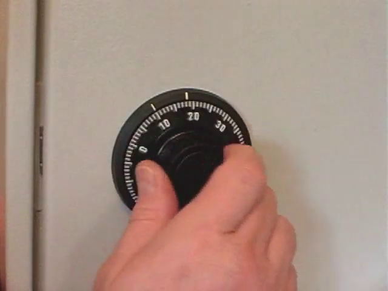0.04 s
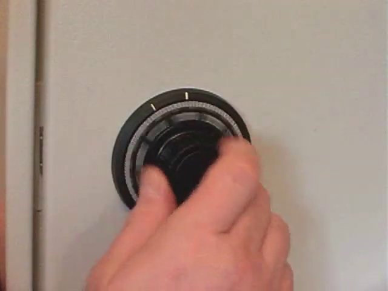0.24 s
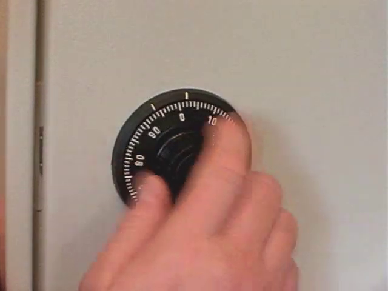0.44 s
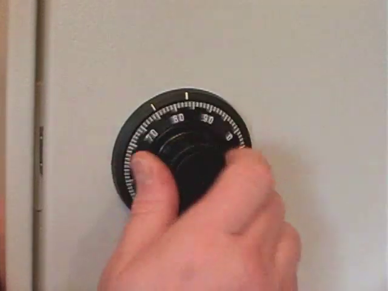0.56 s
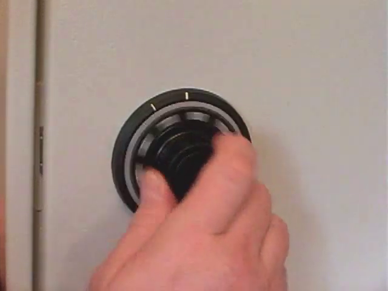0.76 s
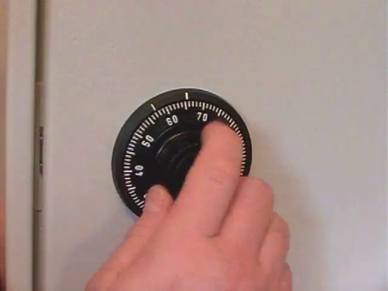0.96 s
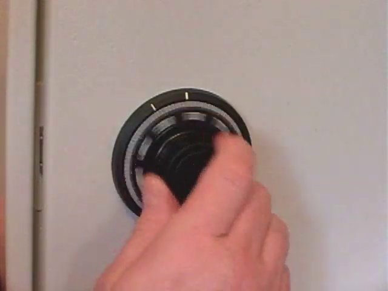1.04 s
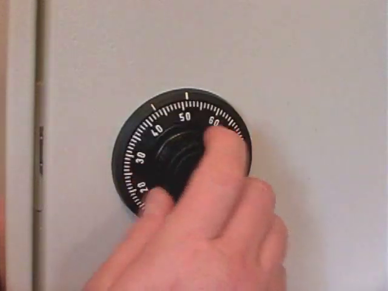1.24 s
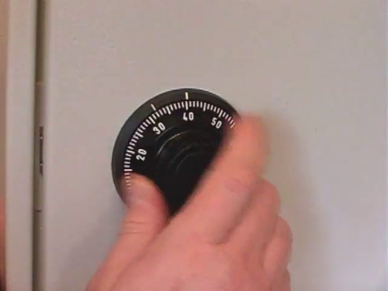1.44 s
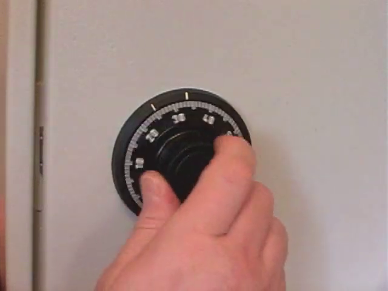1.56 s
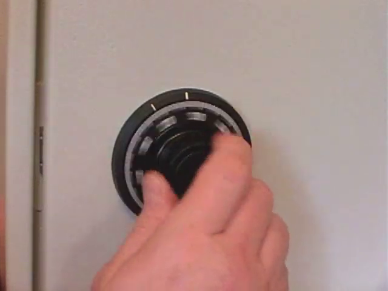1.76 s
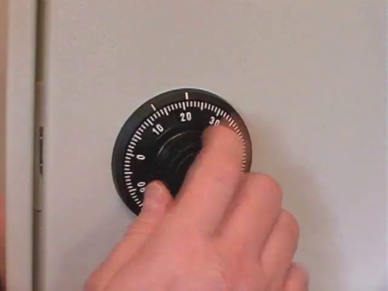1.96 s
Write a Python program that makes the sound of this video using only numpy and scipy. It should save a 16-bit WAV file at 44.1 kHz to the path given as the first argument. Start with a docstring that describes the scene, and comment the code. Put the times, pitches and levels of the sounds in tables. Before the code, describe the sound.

A safe's combination dial spins in about eight quick turns over two seconds, each a short metallic rub with a low shudder from the steel door. The lock catches with a ringing clack at about 0.35 seconds, again at 0.6 and more softly at 0.9, among small ticks. From 1.1 seconds the turns are quieter. The room is small and quiet, with faint hiss and a thin high whine.

```python
"""A steel safe door shudders with a low note as a hand spins its combination dial in eight quick turns.
Friction drives the door's resonances and makes the spindle rub and faintly sing. The lock's wheels
catch with a clack that sets the case ringing, and small metal parts tick. The hand rumbles on the knob.
The room is small and quiet; behind it all lie a camera's hiss and thin whine."""
import sys
import numpy as np
from scipy import signal
from scipy.fft import rfft, irfft
from scipy.io import wavfile
from scipy.ndimage import uniform_filter1d

SR = 44100
rng = np.random.default_rng(int(sys.argv[2]) if len(sys.argv) > 2 else 0)


def wav_out(sig):
    """Save sig, one row per channel (or a flat mono array), as 16-bit PCM at SR to the path in sys.argv[1]."""
    wavfile.write(sys.argv[1], SR, np.round(np.clip(np.atleast_2d(sig).T, -1, 1) * 32767).astype(np.int16))


N = 88200
TIME = np.arange(N) / SR


def door():
    """Forced vibration: friction drives the door's main note and, more loosely, its other resonances."""
    # The door's shudders. Each row: start in seconds, length in seconds, level of the main note in dB,
    # level of the other resonances in dB.
    shudders = [(-.01, 0.0077, -60, -48.5), (.042, 0.025, -46.5, -48), (.1, 0.053, -45.5, -46),
                (0.19, 0.19, -55.5, -65), (0.321, 0.063, -43.5, -48.5), (0.357, 0.036, -38.5, -38.5),
                (0.546, 0.051, -41, -41.5), (0.573, 0.051, -43, -40.5), (.65, 0.055, -50, -48),
                (0.789, 0.0046, -52.5, -52.5), (0.847, 0.056, -60, -51), (0.902, 0.09, -47, -47.5),
                (1.099, 0.051, -50, -56.5), (1.144, 0.073, -48.5, -51), (1.287, 0.055, -57.5, -55),
                (1.365, 0.0053, -47, -45.5), (1.41, 0.071, -57, -54.5), (1.592, .02, -45.5, -58),
                (1.613, 0.029, -47, -53), (1.643, 0.074, -71, -56), (1.823, 0.045, -51, -52.5),
                (1.896, 0.067, -63, -55.5)]
    # The other resonances. Each row: frequency in Hz, bandwidth in Hz, relative level in dB.
    resonances = [(99, 6.7, -18), (143.2, 4, -10), (247, 10, 0), (286, 11, -2.5), (310.1, 4, 0),
                  (334.5, 13, -2), (394, 6, -9.5), (428, 12.6, -9.5), (494, 54, -14), (532, 38, -16.5),
                  (637, 38, -14.5), (715, 15, -12), (846, 73, -11)]
    rise_s, t60_s, steadiness = 0.0077, 0.23, 0.95
    note = tone(hz=232.7, wander_hz=3.62, wander_width_hz=31.5)
    ring = unit(sum(amp(db) * band(hz, width) for hz, width, db in resonances))
    power = uniform_filter1d(ring ** 2, size=900) + 1e-6
    ring = unit(ring / power ** (steadiness / 2))  # evens out most of the random swelling
    note_strokes = [(start, length, db) for start, length, db, _ in shudders]
    ring_strokes = [(start, length, db) for start, length, _, db in shudders]
    return note * strokes(note_strokes, rise_s, t60_s) + ring * strokes(ring_strokes, rise_s, t60_s)


def wheels():
    """Impact excitation: each catch gives a crack and a rattle, and the lock case's modes ring freely."""
    # The catches. Each row: start in seconds, then relative levels in dB of the crack, of its part
    # below shelf_hz, and of the case's ring.
    clacks = [(.3588, -1, -1, -1.5), (.588, -5, -5, -16), (.9135, -21.5, 3, -9), (.922, -17, -2, -20)]
    # The crack's spectrum. Each row: frequency in Hz, relative spectral density in dB.
    crack_spectrum = [(30, -49), (120, -15), (350, -6), (700, 0), (1100, 1.5), (1700, 4.5), (2400, 0.5),
                      (3400, 1), (4100, -3), (4800, -7), (5700, -9.5), (7500, -12.5), (9300, -15),
                      (10300, -14), (11500, -21.5), (16000, -30)]
    # The case's modes. Each entry: frequency in Hz in the first list, relative level in dB in the second.
    modes_hz = [142, 429, 713, 849, 1167, 1315, 1644, 1744, 2237, 3075, 3241, 3430, 3569, 5590, 5841, 10220]
    modes_db = [-10.5, -16.5, -7, -15, -7.5, -13, -3, -2, 1, -7, 1.5, 0, -5, -4, -17, -14]
    crack_db, crack_hold_s, rattle_db, case_db = -28.5, 0.0057, -14, -40
    shelf_hz, direct_shelf_db = 2500, -8  # the direct crack is thinner than its reverberation
    direct, full, ring = np.zeros((3, N))
    t = TIME[:SR]
    envelope = fade(t - crack_hold_s, t60=0.038) + amp(rattle_db) * fade(t, t60=0.1)
    for start, db, mids_db, ring_db in clacks:
        crack = rng.choice([-1, 1], len(t)) * envelope
        for path, shelf_db in ((full, mids_db), (direct, mids_db + direct_shelf_db)):
            spectrum = [(hz, level + shelf_db * (hz < shelf_hz)) for hz, level in crack_spectrum]
            add(path, start, amp(crack_db + db) * colour(crack, spectrum))
        for hz, mode_db in zip(modes_hz, modes_db):
            t60 = 0.43 * (hz / 1000) ** -0.64  # higher modes die sooner
            mode = np.sin(2 * np.pi * (hz * t + rng.random()))
            add(ring, start, amp(case_db + ring_db + mode_db) * fade(t, t60) * mode)
    echoes = room(full, wet_db=-2.5) - full
    return direct + echoes + ring


def spindle():
    """Stick-slip friction: dense tiny slips of metal on metal, now and then with a thin singing ring."""
    # Spells of rubbing and of singing. Each row: start in seconds, length in seconds, level in dB.
    rubs = [(.096, 0.056, -46), (.325, 0.042, -47.5), (.566, 0.027, -43.5), (.858, 0.064, -50.5),
            (.912, 0.03, -44), (1.118, 0.072, -49.5), (1.39, 0.044, -51.5), (1.622, 0.013, -52),
            (1.866, 0.035, -54)]
    sings = [(.25, 0.072, -66), (.38, 0.087, -52), (1.28, 0.11, -64)]
    # The spectrum of the rubbing. Each row: frequency in Hz, relative spectral density in dB.
    rub_spectrum = [(200, -22), (500, 2.5), (1100, -3), (2000, -1.5), (3400, 4), (4600, -1.5), (5200, -12),
                    (5600, 5), (6300, -8.5), (9000, -22), (15000, -44)]
    slips_per_s = 3000
    slips = (rng.random(N) < slips_per_s / SR) * rng.choice([-1, 1], N)
    friction = unit(slips) * strokes(rubs, rise_s=0.0065, t60=0.022)
    rub = room(colour(friction, rub_spectrum), wet_db=-6.5)
    singing = tone(hz=3440, wander_hz=25, wander_width_hz=120)
    return rub + singing * strokes(sings, rise_s=0.037, t60=0.17)


def ticks():
    """Damped free vibration: a small metal part snaps and rings briefly at two unsteady pitches."""
    # The ticks. Each row: start in seconds, level of the lower ring in dB, level of the upper ring in dB.
    strikes = [(.134, -37, -31.5), (0.322, -41, -32.5), (0.332, -41.5, -34.5), (0.358, -27, -30.5),
               (0.5693, -31, -50), (0.5887, -32, -47), (0.636, -40.5, -64), (.922, -36.5, -73),
               (.944, -58, -65), (1.144, -54, -65), (1.277, -51.5, -65)]
    # The snap's spectrum. Each row: frequency in Hz, relative spectral density in dB.
    snap_spectrum = [(500, -30), (3000, -8), (7000, -5), (8300, 6), (11000, -8), (13000, -12), (16000, -26)]
    low_hz, high_hz, pitch_spread = 5580, 10110, 0.011
    rise_s, snap_db = 0.0024, -10.5
    out, t = np.zeros(N), TIME[:SR // 10]
    envelope = np.minimum(t / rise_s, 1) * fade(t - rise_s, t60=0.025)
    for start, low_db, high_db in strikes:
        for hz, db in ((low_hz, low_db), (high_hz, high_db)):
            waver = unit(uniform_filter1d(rng.standard_normal(len(t)), size=30))
            phase = 2 * np.pi * np.cumsum(hz * (1 + pitch_spread * waver)) / SR
            add(out, start, amp(db) * envelope * np.sin(phase))
        snap = rng.standard_normal(len(t)) * fade(t, t60=0.015)
        add(out, start, amp(high_db + snap_db) * colour(snap, snap_spectrum))
    return room(out, wet_db=-8)


def hand_rumble():
    """Narrow-band noise: a faint deep rumble while the hand works hardest on the knob."""
    # The hand's efforts. Each row: start in seconds, length in seconds, level in dB.
    efforts = [(.2, 0.26, -68), (.58, 0.38, -68)]
    return band(hz=43, width_hz=8) * strokes(efforts, rise_s=0.068, t60=0.136)


def room(x, wet_db):
    """Reverberation: adds a dense, even tail in which each band dies at its own rate."""
    # The room's decay. Each row: frequency in Hz, reverberation time in seconds.
    decay_times = [(100, 0.46), (300, 0.39), (700, 0.73), (1400, 0.39), (3300, 0.41), (5500, 0.38),
                   (10000, 0.29), (16000, 0.22)]
    peak_ratio, build_up_s = 2.23, 0.014
    hz, t, noise = signal.stft(rng.choice([-1., 1.], SR), SR, nperseg=256)
    decaying = noise * fade(t, read(decay_times, hz)[:, None])
    spectrum = rfft(signal.istft(decaying, SR, nperseg=256)[1][:SR])
    ceiling = peak_ratio * uniform_filter1d(abs(spectrum), size=400)  # caps the strongest resonances
    tail = irfft(spectrum / np.maximum(abs(spectrum) / ceiling, 1), SR)[:SR // 2]
    tail *= np.minimum(TIME[:SR // 2] / build_up_s, 1) ** 2
    return x + amp(wet_db) * signal.fftconvolve(x, tail / np.linalg.norm(tail))[:N]


def background():
    """Broadband noise and spectral lines: room tone and hiss, the camera's whine and faint rapid chirps."""
    # Room tone and hiss. Each row: frequency in Hz, relative spectral density in dB.
    hiss_spectrum = [(15, -21), (25, -17.5), (92, -8.5), (242, -5), (285, -14), (344, -10), (439, -11),
                     (607, -12.5), (1370, -15.5), (2110, -17), (2280, -17), (3520, -18.5), (4370, -19.5),
                     (5730, -19.5), (10700, -23), (13600, -19), (16000, -33.5)]
    # The lines of the whine. Each entry: frequency in Hz.
    lines_hz = [13184, 15195, 15224]
    # The same lines. Each row: level in dB, rms pitch wander in Hz.
    lines = [(-62.5, 0.5), (-66, 1.5), (-78, 4)]
    hiss_db, chirp_db = -54, -50
    chirp_at_s, chirps_per_s, chirp_width_s = 0.0342, 29.97, 0.0007
    centre_hz, sweep_hz_per_s = 13800, 900000
    hiss = amp(hiss_db) * colour(rng.standard_normal(N), hiss_spectrum)
    whine = sum(amp(db) * tone(hz, wander, wander_width_hz=18) for hz, (db, wander) in zip(lines_hz, lines))
    # time from the centre of the nearest chirp
    offset_s = (((TIME - chirp_at_s) * chirps_per_s + .5) % 1 - .5) / chirps_per_s
    sweep = np.sin(2 * np.pi * (centre_hz + sweep_hz_per_s * offset_s / 2) * offset_s)
    pulses = np.exp(-.5 * (offset_s / chirp_width_s) ** 2)
    return hiss + whine + amp(chirp_db) * sweep * pulses


def tone(hz, wander_hz, wander_width_hz):
    """Frequency modulation: a sine of rms 1 whose pitch wanders at random."""
    pitch_hz = hz + wander_hz * band(0, wander_width_hz)
    return np.sqrt(2) * np.sin(2 * np.pi * np.cumsum(pitch_hz) / SR)


def band(hz, width_hz):
    """Resonance: noise of rms 1 gathered around one frequency."""
    f = np.fft.rfftfreq(N, 1 / SR)
    return unit(irfft(rfft(rng.standard_normal(N)) / (1 + (2 * (f - hz) / width_hz) ** 2), N))


def colour(x, points, size=4096):
    """Spectral shaping by a causal filter of unit energy."""
    log_gain = np.log(amp(read(points, abs(np.fft.fftfreq(size, 1 / SR)))))
    taps = np.fft.ifft(np.exp(np.conj(signal.hilbert(log_gain)))).real[:size // 2]
    return signal.fftconvolve(x, taps / np.linalg.norm(taps))[:len(x)]


def strokes(rows, rise_s, t60):
    """Incoherent addition: each row's envelope rises, holds and decays, and their powers sum."""
    envelopes = (amp(db) * np.clip((TIME - start) / rise_s, 0, 1) * fade(TIME - start - length, t60)
                 for start, length, db in rows)
    return np.sqrt(sum(envelope ** 2 for envelope in envelopes))


def fade(t, t60):
    """Exponential decay from t = 0, by 60 dB in t60 seconds."""
    return np.exp(-np.log(1000) * np.maximum(t, 0) / t60)


def amp(db):
    """Decibels to amplitude ratio."""
    return 10 ** (np.asarray(db) / 20)


def unit(x):
    """Normalisation to rms 1."""
    return x / np.sqrt(np.mean(x ** 2) + 1e-20)


def read(points, hz):
    """Interpolation of a table on a log-frequency axis."""
    f, value = np.transpose(points)
    return np.interp(np.log(hz + 1), np.log(f), value)


def add(mix, start_s, sound):
    """Superposition of a sound on the mix from start_s onward."""
    part = mix[max(round(start_s * SR), 0):][:len(sound)]
    part += sound[:len(part)]


def scene():
    """Superposition: all sources sum in one channel."""
    return (door() + spindle() + wheels() + ticks() + hand_rumble() + background())[None]


def record(dry):
    """Linear filtering: five narrow, evenly spaced notches in the treble, then a low-pass band limit."""
    spacing_hz, width_hz, notch_db, cutoff_hz = 2180, 137, -6.5, 15600
    hz = np.fft.rfftfreq(N, 1 / SR)
    notches = sum(np.exp(-((hz - k * spacing_hz) / width_hz) ** 2) for k in range(2, 7))
    notched = irfft(rfft(dry) * amp(notch_db * notches), N)
    low_pass = signal.firwin(255, cutoff_hz, window=("kaiser", 8), fs=SR)
    return signal.oaconvolve(notched, low_pass[None], "same")


dry = scene()
out = record(dry)
wav_out(out)
```